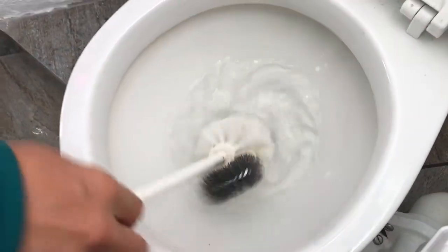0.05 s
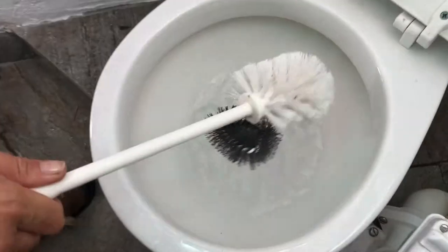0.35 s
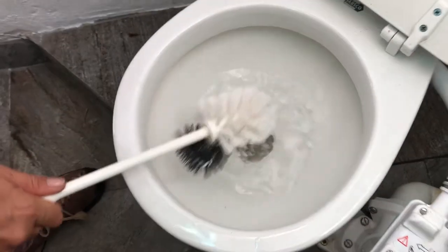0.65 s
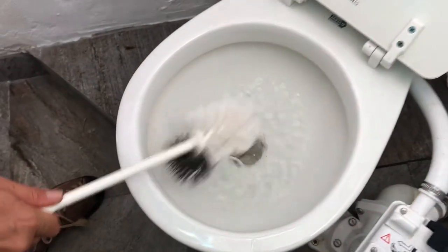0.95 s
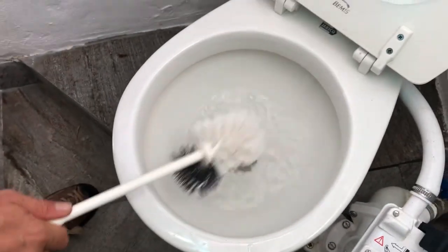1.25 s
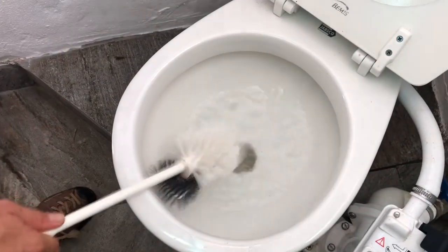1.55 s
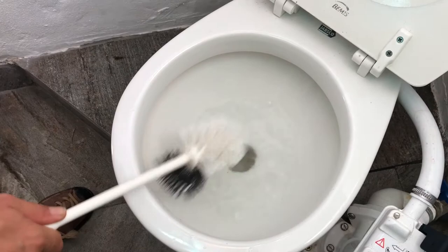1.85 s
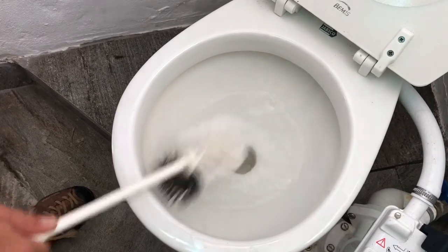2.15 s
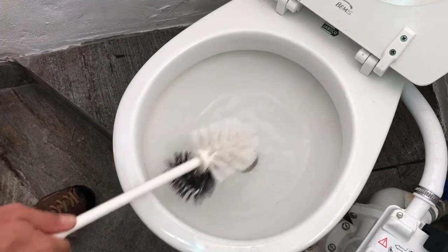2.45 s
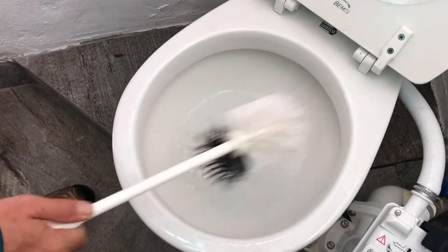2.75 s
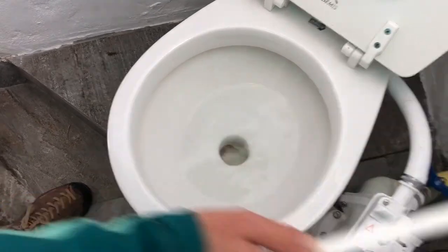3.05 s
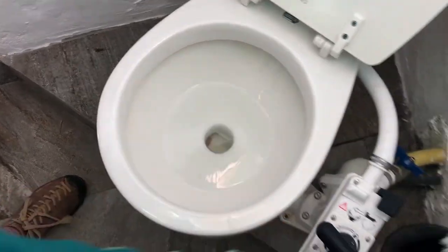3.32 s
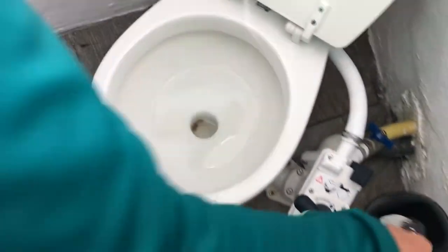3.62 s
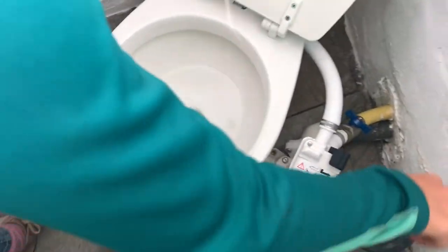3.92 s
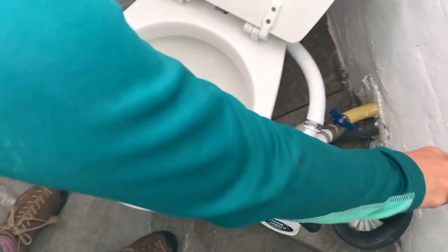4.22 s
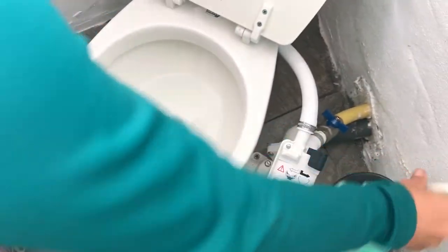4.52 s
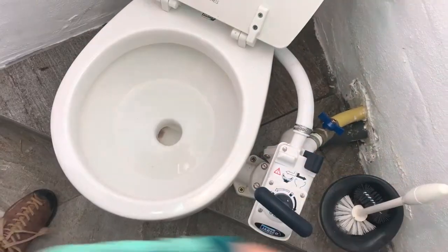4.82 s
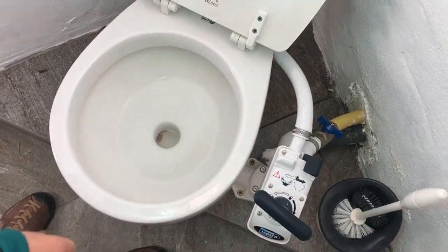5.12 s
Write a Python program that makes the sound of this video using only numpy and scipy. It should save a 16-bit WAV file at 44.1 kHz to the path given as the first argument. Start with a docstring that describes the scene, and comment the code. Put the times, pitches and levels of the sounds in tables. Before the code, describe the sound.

A few light drips and a fine splash, then a wet toilet brush knocks against a porcelain bowl about five times a second, each sharp click ringing briefly over a hollow hum from the drain. After a pause, the brush drops into its plastic holder with dull thuds, a rustle of bristles and a few handle ticks. It is heard from above the bowl in a small room with a low rumble.

```python
"""Toilet brush in bowl and holder.

A wet brush is pumped into the drain of a porcelain bowl in a small room, knocking on the glaze about
five times a second. Each knock cracks and rings the bowl; the drain hums under the strokes and a little
water drips. The brush then goes into its plastic holder with dull thuds, a rustle of bristles and a few
handle ticks, over a low room rumble."""
import sys
import numpy as np
from scipy import signal
from scipy.fft import rfft, irfft, next_fast_len
from scipy.io import wavfile

SR = 44100
rng = np.random.default_rng(int(sys.argv[2]) if len(sys.argv) > 2 else 0)


def master(y):
    """Save y as 16-bit WAV."""
    cut = np.clip(np.atleast_2d(y).T, -1, 1)
    pcm = np.round(cut * 32767)  # scale
    wavfile.write(sys.argv[1], SR, pcm.astype(np.int16))


N = 232757
TAIL_S = np.arange(SR // 2) / SR   # time after a blow

# brush head on porcelain:
# (time [s], strength [dB], slide [0 square, 1 glancing], ping of the spot [dB], push on drain air [dB])
BOWL_BLOWS = [(0.6341, -39, 0.11, -2, -54), (0.8462, -38, 0.055, 1, -48), (1.0312, -38.7, 0.16, 2.5, -48),
              (1.2365, -37.5, 0.17, 1, -50), (1.4212, -37, 0.22, 1, -47), (1.6084, -36, 0.43, .5, -48.5),
              (1.802, -36, 0.75, 0, -47), (1.8651, -48.5, 0.17, 1, -40), (1.9974, -36, 0.86, -3, -44.5),
              (2.0623, -47.5, 0.46, 0.5, -40.5), (2.2305, -38, 0.27, -4, -52.5),
              (2.4267, -36, 1, -4.5, -47.5), (2.599, -35.5, 0.56, -0.5, -48), (2.654, -43, 0.36, 0, -52)]
# brush catching on its holder: (time [s], thud [dB], scuff [dB], scuff top [Hz])
HOLDER_CONTACTS = [(3.7043, -48, -40.5, 5800), (3.735, -33, -56, 2000), (3.7767, -43.5, -39, 2900),
                   (3.801, -49, -45.5, 8050), (3.834, -50.5, -44, 3000), (3.8805, -48, -34, 1980),
                   (3.933, -43, -38, 9100), (3.945, -40, -44, 13000), (3.9714, -30.5, -30, 14200),
                   (3.988, -32, -54, 3000), (4.012, -33, -48, 7000), (4.037, -40, -39, 3870),
                   (4.169, -53, -44, 4540), (4.5375, -37, -41.5, 1800)]


def bowl_knocks(crack_db=38.5, wash_db=29.5, tick_t60_s=0.0071, body_t60_s=0.0092, split_hz=6300):
    """Hard plastic on glaze: crack, wash, ringing porcelain. Glancing blows crack less and ring more."""
    # porcelain modes: (frequency [Hz], level [dB], t60 [s])
    bowl_modes = [(462, -17, .25), (527, -11, .25), (570, -15, .3), (683, -11, .2), (1049, -6.5, .2),
                  (1119, -1, .21), (1222, 0, .2), (1250, -1, .23), (1290, -8, .18), (1337, -10, .2),
                  (2030, -21, .13), (2400, -20, .12), (2440, -16, .16), (2605, -18, .12), (3020, -15, .15),
                  (3070, -15, .15), (3135, -12, .23), (3226, -8, .13), (3292, -7, .11), (3423, 4, .175),
                  (3675, -14, .15), (3994, -9, .15), (4160, -8, .14), (4559, -3, .14), (4886, -6, .14),
                  (5020, -7, .13), (5380, -2, .13), (5735, -9, .15), (7848, -7, .13), (8003, -4, .13),
                  (8222, -7, .13), (9710, -18, .15), (10450, -15, .12)]
    # spectra of the crack and of its wash off bowl and walls: (frequency [Hz], level [dB])
    crack_spectrum = [(100, 6.5), (400, -17), (700, -12.5), (1200, -4.5), (1800, -17.5), (2400, -5),
                      (2780, -8), (3250, 13), (3700, 2.5), (5300, 5), (6500, -0.5), (7700, 6.5),
                      (9300, -7.5), (11000, -11.5), (15500, -29)]
    wash_spectrum = [(100, 5), (350, -5.5), (600, 4), (850, -4), (1200, 2), (1550, -7.5), (2000, -7),
                     (2800, -1), (3300, 3.5), (5300, 4.5), (6200, -1.5), (8100, -1), (9500, -4.5),
                     (15500, -12)]
    # a spot that favours the main ring starves its neighbours: (frequency [Hz], gain per ping [dB/dB])
    ping_tilt = [(800, 1), (1200, -2.9), (2600, -1), (3300, 0.5), (3900, -1), (5300, -1.37), (6600, 1)]
    out, walls = np.zeros(N), reflections()
    family = np.digitize(np.array(bowl_modes)[:, 0], [2000, 3800])   # low ring, main ring, overtones
    for s, db, slide, ping_db, _ in BOWL_BLOWS:
        grit = rng.choice([-1, 1], len(TAIL_S))
        # short bending waves travel fastest: treble arrives first, ends first
        tick = butter(colour(grit * fade(tick_t60_s), crack_spectrum), split_hz, "high")
        body = butter(colour(grit * fade(body_t60_s) * rise(0.016), crack_spectrum), split_hz, "low")
        body = colour(body, [(hz, share * ping_db) for hz, share in ping_tilt])
        crack = unit_energy(body) + from_db(-2.5) * unit_energy(tick)
        crack *= from_db(db + crack_db - 8.5 * slide)
        # walls stay, brush moves: part of the reflections changes per blow
        wash = unit_energy(colour(walls + 1.73 * reflections(), wash_spectrum))
        wash *= from_db(db + wash_db + 1.5 * slide)
        clack_db = 4 - 16 * slide   # the head's own clack needs a square blow
        treble_db = -2.5 + 2.5 * slide + 0.47 * (db + 41.5)   # weaker blows are duller
        tone = [(1400, 0), (2300, clack_db), (3100, 0), (5500, 0), (8000, treble_db)]
        hit = butter(colour(crack + wash, tone), 150, "high")
        gains = from_db([db + 0.5, db - 0.3 + ping_db + 8 * slide, db - 5 + 1.5 * slide])[family]
        build_up = rise(0.029)   # the blow spreads round the bowl
        add(out, s, hit + build_up * ring(bowl_modes, gains, spread_db=0.5))
    return out


def drain(hum_hz=184.5, hum_t60_s=0.6, wander_hz=3.35, flutter_db=3, plunge_hz=335, deep_push_db=-40.5):
    """Each push chokes and restarts the drain's hollow note; a deep plunge adds its upper resonance."""
    envelope, upper = np.zeros(N), np.zeros(N)
    plunge = np.sin(2 * np.pi * plunge_hz * TAIL_S) * fade(0.15) * rise(0.018)
    for s, *_, push_db in BOWL_BLOWS:
        envelope[round(s * SR):] = 0
        add(envelope, s, from_db(push_db) * rise(0.076) * fade(hum_t60_s))
        plunge_db = deep_push_db + 1.4 * (push_db - deep_push_db) - 0.5   # grows faster than the push
        add(upper, s, from_db(plunge_db) * plunge)
    phase = 2 * np.pi * np.cumsum(hum_hz + wander_hz * drift(29.44)) / SR
    hum = np.sqrt(2) * np.sin(phase) * butter(envelope, 25, "low")
    return upper + hum * from_db(2 + flutter_db * drift(40))


def drips(life_cycles=48, glide=0.16, tick_db=-10, tick_t60_s=0.008):
    """Each drop ticks on the water and leaves a bubble rising in pitch; spray crackles around them."""
    # drops: (time [s], level [dB], bubble [Hz])
    drops = [(.167, -52, 3010), (.178, -47, 11600), (0.257, -49, 8600), (0.3214, -45, 6950),
             (.341, -52.5, 2000), (.342, -48.5, 4500), (0.348, -50, 995), (0.366, -49.5, 1246),
             (0.367, -52, 2900), (0.449, -47, 9700), (.547, -46, 6260), (.5626, -45, 6750),
             (0.596, -45, 6800), (0.603, -53, 2100), (0.7338, -41, 4000), (1.3444, -52, 5460)]
    # spray flicked up as the bristles enter the water: (time [s], level [dB])
    spray_levels = [(0, -82), (.17, -69.5), (.3, -80), (.36, -71), (.5, -78), (.56, -64.5), (.66, -58.5),
                    (.8, -84), (1.1, -125)]
    # spray spectrum: (frequency [Hz], level [dB])
    spray_spectrum = [(1000, -15), (3000, 9), (6000, 4), (11000, 4), (15500, 0)]
    out = np.zeros(N)
    for s, db, hz in drops:
        life_s = life_cycles / hz
        pitch_hz = hz * (1 + glide * (2 * np.minimum(TAIL_S / life_s, 1) - 0.3))
        bubble = np.sin(2 * np.pi * np.cumsum(pitch_hz) / SR) * fade(life_s)
        burst = rng.standard_normal(len(TAIL_S)) * fade(tick_t60_s)
        tick = butter(burst, [hz / 1.3, hz * 2.9], "band")   # smaller drops tick higher
        add(out, s, from_db(db) * (bubble + from_db(tick_db) * tick))
    spray = unit_rms(colour(crackle(per_s=830, size_db=5.5), spray_spectrum))
    return in_room(out + spray * from_db(in_time(spray_levels)), wet_db=-3.5)


def holder_thuds(level_db=1.5, cushion_hz=1040, squash_s=0.02, press_loss_db=3.5):
    """The head thuds into the plastic cup; bristles cushion the upper modes and damp the earlier ring."""
    # cup modes: (frequency [Hz], level [dB], t60 [s])
    cup_modes = [(336.3, -7, 0.26), (385, -13.5, 0.22), (510.5, 0.5, 0.065), (565, -5, 0.2),
                 (637.6, 2.5, 0.085), (697, -5, 0.1), (803, -0.5, 0.026), (890, -18.5, 0.24),
                 (990, -37, 0.07), (1297, -20, 0.11), (1590, -8, 0.037), (1880, -30, .06)]
    out = np.zeros(N)
    cushion = 1 / np.sqrt(1 + (np.array(cup_modes)[:, 0] / cushion_hz) ** 4)
    hardest_db = max(row[1] for row in HOLDER_CONTACTS)
    for s, db, _, _ in HOLDER_CONTACTS:
        pressed = np.clip((np.arange(N) / SR - s) / squash_s, 0, 1)
        out *= from_db(-press_loss_db * from_db(db - hardest_db) * pressed)
        thud = ring(cup_modes, from_db(db + level_db) * cushion, spread_db=-0.5)
        add(out, s, thud * rise(squash_s))
    return in_room(out, wet_db=-14)


def bristles(scuff_db=3.5, scuff_t60_s=0.039, scuff_low_hz=1200, rustle_db=-2.5):
    """Single scuffs over a rustle of countless small slips, both coloured by the hollow cup."""
    # bristles and sleeve rub as the brush goes in and is let go: (time [s], length [s], level [dB])
    rubs = [(3.695, .14, -53.5), (3.854, 0.036, -56), (3.925, 0.14, -48), (4.124, 0.18, -57),
            (4.32, 0.32, -59.5), (4.945, 0.13, -59)]
    # bristle spectrum in the cup: (frequency [Hz], level [dB])
    cup_spectrum = [(200, -18), (600, 12), (1000, 8.5), (1400, 3), (2000, -1), (2550, 1.5), (2950, -2),
                    (3350, 1.5), (4100, -2), (5000, -4.5), (7000, -8.5), (8500, -5.5), (11000, -9.5),
                    (15500, -9)]
    scuffs, rubbing = np.zeros(N), np.zeros(N)
    for s, _, db, top_hz in HOLDER_CONTACTS:
        burst = rng.standard_normal(len(TAIL_S)) * fade(scuff_t60_s) * rise(0.0093)
        scuff = butter(butter(burst, scuff_low_hz, "high"), top_hz, "low", order=3)
        add(scuffs, s, from_db(db + scuff_db) * scuff)
    for s, length_s, db in rubs:
        add(rubbing, s, from_db(db + rustle_db) * rise(0.043) * np.exp(-(TAIL_S / length_s) ** 2))
    rustle = unit_rms(colour(crackle(per_s=5000, size_db=4.5), cup_spectrum)) * rubbing
    return in_room(colour(scuffs, cup_spectrum) + rustle, wet_db=-8.5)


def handle_rattle(ring_db=-4.5, tick_t60_s=0.013, low_hz=1700):
    """The plastic handle ticks and rings faintly as the brush settles."""
    # ticks: (time [s], level [dB], band top [Hz])
    ticks = [(4.354, -36.5, 5070), (4.379, -35, 3100), (4.408, -46, 4400)]
    # handle modes: (frequency [Hz], level [dB], t60 [s])
    handle_modes = [(1780, -12.5, 0.06), (2541, -28, 0.35), (2950, -34, 0.12), (3290, -26, 0.31),
                    (3800, -27, 0.3), (4479, -31, 0.14)]
    out = np.zeros(N)
    for s, db, top_hz in ticks:
        burst = rng.choice([-1, 1], len(TAIL_S)) * fade(tick_t60_s)
        tick = butter(burst, [low_hz, top_hz], "band", order=4)
        ringing = ring(handle_modes, np.ones(len(handle_modes)), spread_db=-5.5)
        add(out, s, from_db(db) * (2 * tick + from_db(ring_db) * ringing))
    return in_room(out, wet_db=-29)


def room_tone(rumble_db=-56.5, hiss_db=-66.5):
    """Low rumble and faint steady hiss."""
    # room noise spectra: (frequency [Hz], level [dB])
    rumble_spectrum = [(15, -40), (25, -24), (37, -13), (66, -4.5), (82, 2), (107, -6), (135, -2.5),
                       (199, -3), (275, -7), (318, -9), (345, -11.5), (579, -15.5), (788, -20), (1200, -24),
                       (1560, -71), (2640, -120)]
    hiss_spectrum = [(710, -17.5), (1200, -3), (1440, -2.5), (1790, -1.5), (2090, -4.5), (3080, -4.5),
                     (4080, -11), (5530, -9.5), (7020, -12), (7740, -8), (8350, -13), (9410, -10),
                     (16000, -21)]
    # rumble lift, highest while the water is stirred: (time [s], gain [dB])
    swell = [(0, 2.5), (1.3, 3.5), (2.6, 0.5), (3.2, 0.5), (5.28, -0.5)]
    rumble = unit_rms(colour(rng.standard_normal(N), rumble_spectrum))
    hiss = unit_rms(colour(rng.standard_normal(N), hiss_spectrum))
    return from_db(rumble_db + in_time(swell)) * rumble + from_db(hiss_db) * hiss


def reflections():
    """Dense echoes off bowl and walls; treble dies first."""
    # room decay: (frequency [Hz], t60 [s])
    decay = [(200, 0.99), (550, 0.35), (1400, 0.24), (3700, 0.17), (9700, 0.14), (16000, 0.052)]
    edges_hz = 60 * 2 ** np.arange(0, 8.6, 0.5)
    white = rng.standard_normal((2, len(TAIL_S)))
    bands = (butter(white[k % 2], [low, high], "band") * fade(at_hz(decay, np.sqrt(low * high)))
             for k, (low, high) in enumerate(zip(edges_hz, edges_hz[1:])))
    return unit_energy(sum(bands) * rise(0.0023))


def in_room(x, wet_db):
    """Direct sound plus reflections."""
    return x + from_db(wet_db) * signal.fftconvolve(x, reflections())[:N]


def ring(modes, gains, spread_db):
    """Struck modes; each blow lands elsewhere, which varies the short-waved high modes most."""
    out = np.zeros(len(TAIL_S))
    chance = rng.uniform(-0.85, 1, (len(modes), 2))
    spread = [(3500, spread_db), (5000, 4 * spread_db)]
    for (hz, db, t60_s), gain, (luck, side) in zip(modes, gains, chance):
        amplitude = gain * from_db(db + at_hz(spread, hz) * luck) * np.sign(side)
        out += amplitude * np.sin(2 * np.pi * hz * TAIL_S) * fade(t60_s)
    return out


def crackle(per_s, size_db, width=1.16):
    """Tiny clicks, each ringing briefly in one of 13 bands; unit rms."""
    centres_hz = np.geomspace(500, 14000, num=13)
    bands = (butter(grains(per_s / len(centres_hz), size_db), [hz / width, hz * width], "band")
             for hz in centres_hz)
    return unit_rms(sum(bands))


def grains(per_s, size_db):
    """Random impulses of very uneven size."""
    when, size, side = rng.random((int(per_s * N / SR), 3)).T
    heights = from_db(size_db * np.minimum(-np.log(1 - size), 4)) * np.sign(side - 0.5)
    return np.bincount((when * N).astype(int), heights, minlength=N)


def colour(x, spectrum):
    """Minimum-phase filter from (frequency [Hz], gain [dB]) points."""
    size = 2 * next_fast_len(len(x))
    bins_hz = np.arange(size // 2 + 1) * SR / size
    cepstrum = irfft(np.log(from_db(at_hz(spectrum, bins_hz))))
    cepstrum[1:size // 2] *= 2
    cepstrum[size // 2 + 1:] = 0
    return irfft(rfft(x, size) * np.exp(rfft(cepstrum)))[:len(x)]


def butter(x, hz, kind, order=2):
    """Butterworth filter."""
    sos = signal.butter(order, np.clip(hz, 10, 0.45 * SR), kind, fs=SR, output="sos")
    return signal.sosfilt(sos, x + 1e-18)


def drift(rate_hz):
    """Linear glides between unit Gaussian values."""
    points = rng.standard_normal(1000)
    return np.interp(np.arange(N) / SR * rate_hz, np.arange(len(points)), points)


def fade(t60_s):
    """Exponential decay."""
    return np.exp(-np.log(1000) * TAIL_S / t60_s)


def rise(settle_s):
    """Exponential attack."""
    return 1 - fade(settle_s)


def add(out, s, sound):
    """Mix a sound in at time s."""
    start = max(0, round(s * SR))
    out[start:start + len(sound)] += sound[:N - start]


def in_time(rows):
    """A (time [s], value) curve at every sample."""
    return np.interp(np.arange(N) / SR, *np.transpose(rows))


def at_hz(points, hz):
    """Read a (frequency [Hz], value) table on a log axis."""
    freqs, values = np.transpose(points)
    return np.interp(np.log(np.maximum(hz, 1)), np.log(freqs), values)


def from_db(db):
    """Decibels to gain."""
    return 10 ** (np.asarray(db) / 20)


def unit_rms(x):
    """Scale to unit rms."""
    return x / np.sqrt(np.mean(x ** 2) + 1e-20)


def unit_energy(x):
    """Scale to unit energy."""
    return x / np.sqrt(np.sum(x ** 2) + 1e-20)


def scene():
    """All sources in mono, heard above the bowl."""
    at_bowl = bowl_knocks() + drain() + drips()
    at_holder = holder_thuds() + bristles() + handle_rattle()
    return (at_bowl + at_holder + room_tone())[None]


def record(dry):
    """Microphone band: 25 Hz high-pass, steep 16 kHz low-pass."""
    heard = butter(dry, 25, "high", order=4)
    return signal.sosfilt(signal.ellip(10, 0.2, 80, 16000, fs=SR, output="sos"), heard)


dry = scene()
out = record(dry)
master(out)
```